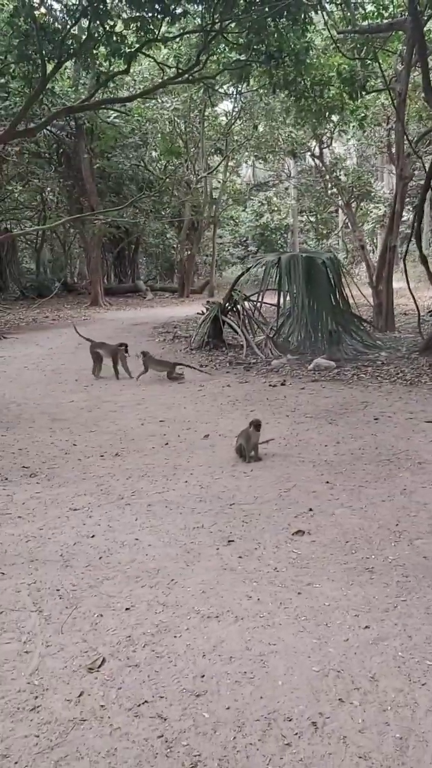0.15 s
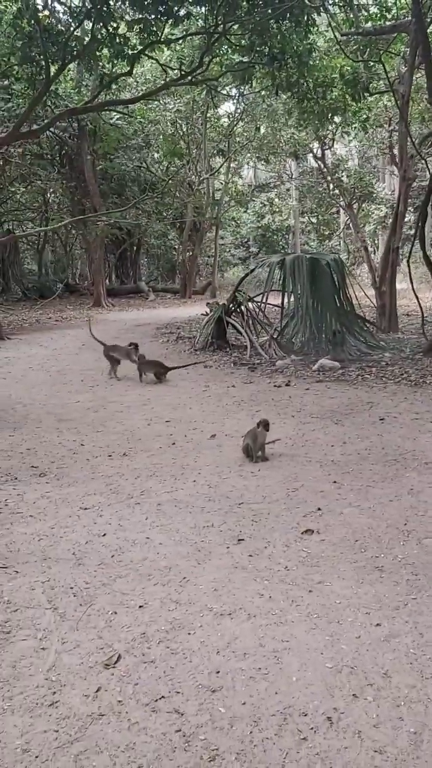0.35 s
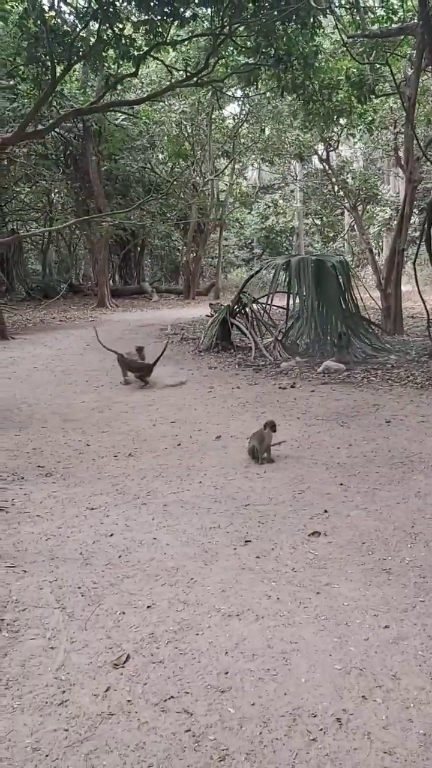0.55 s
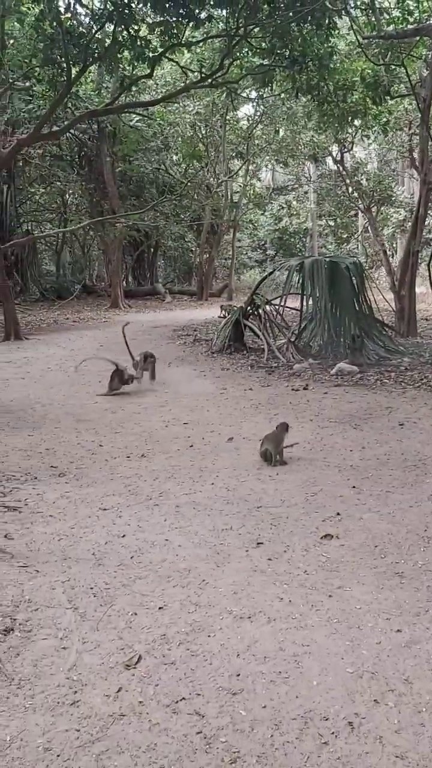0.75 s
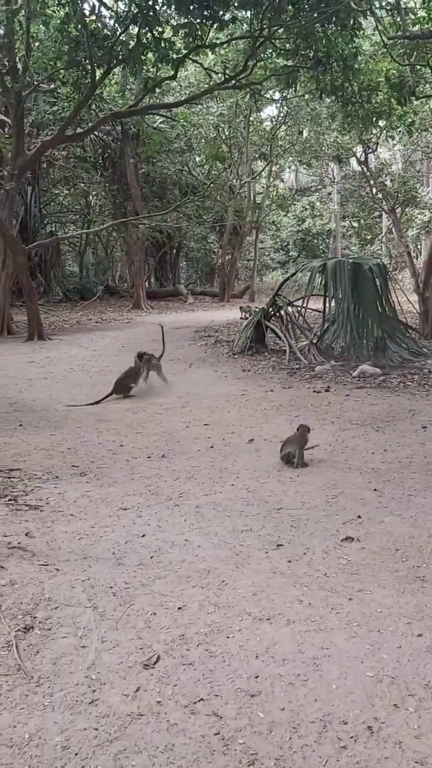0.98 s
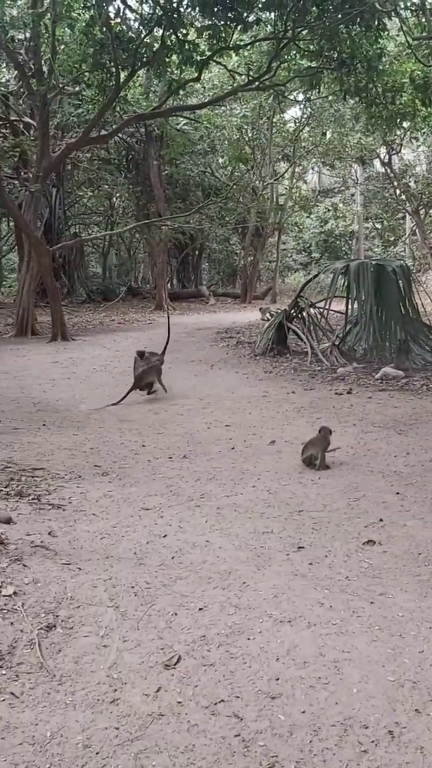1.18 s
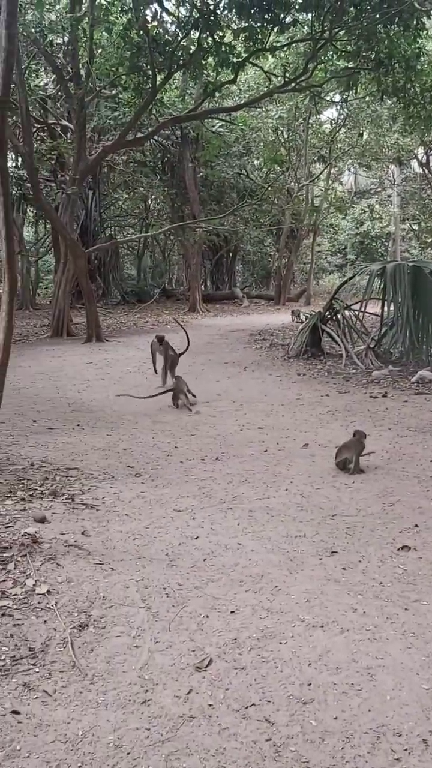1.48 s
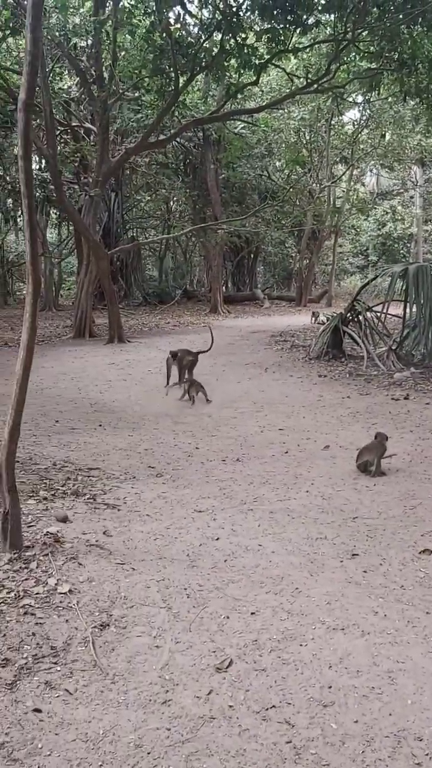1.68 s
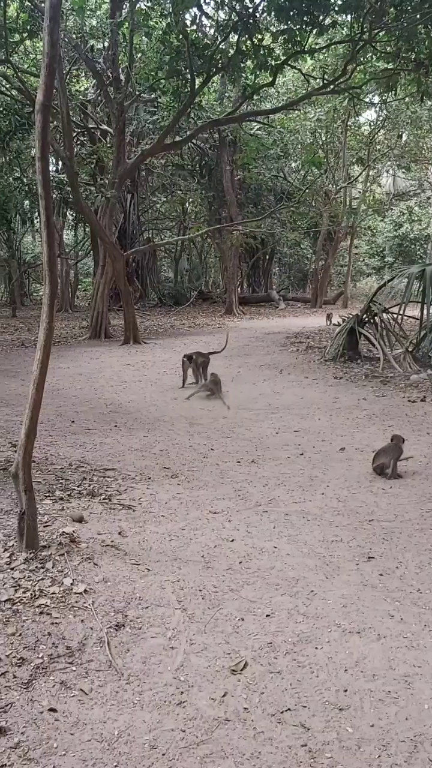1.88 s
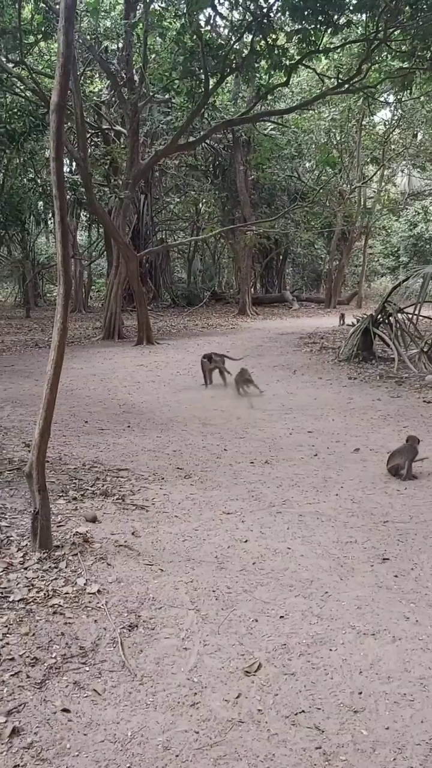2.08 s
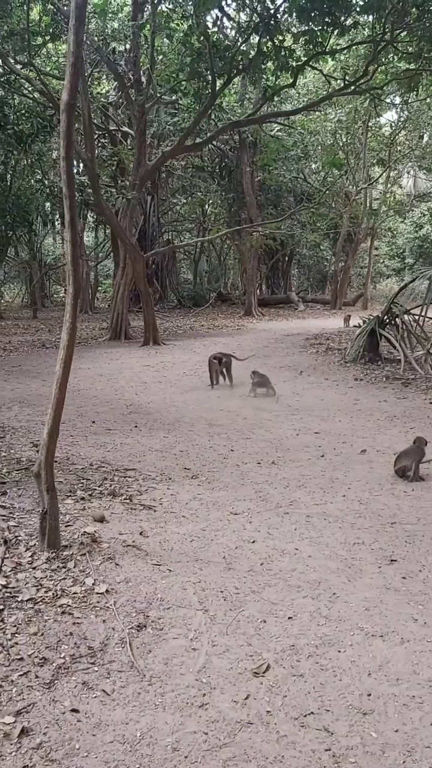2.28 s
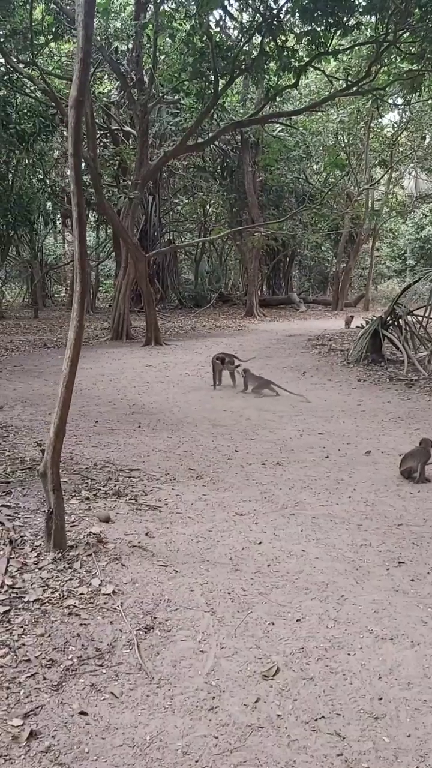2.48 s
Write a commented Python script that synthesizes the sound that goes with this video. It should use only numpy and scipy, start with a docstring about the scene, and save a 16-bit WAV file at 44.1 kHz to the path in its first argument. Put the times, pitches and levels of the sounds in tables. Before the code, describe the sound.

A monkey's long harsh shriek drops into a bark and a raspy snarl among trees.

```python
"""A monkey yelps, climbs into a long harsh shriek and falls off into a bark; a raspy snarl follows.
Two small monkeys are scuffling on a dirt path in a forest, several metres away. Their vocal folds
break from a clear tone into chaos as air rasps through, and tree trunks scatter the calls.
Insects whirr over a low rumble, with a few near knocks and scuffs of grit."""
import sys
import numpy as np
from scipy import signal
from scipy.fft import rfft, irfft
from scipy.io import wavfile
from scipy.ndimage import map_coordinates

SR = 44100
rng = np.random.default_rng(int(sys.argv[2]) if len(sys.argv) > 2 else 0)


def dump(signal):
    """Clip the signal to [-1, 1] and save it as 16-bit WAV at the path in sys.argv[1]."""
    limited = np.clip(np.atleast_2d(signal).T, -1, 1)
    pcm = np.round(limited * 32767).astype(np.int16)
    wavfile.write(sys.argv[1], SR, pcm)


N = 116865
T = np.arange(N) / SR
HZ = np.arange(N // 2 + 1) * SR / N

CUTOFF_HZ = 15900
JITTER_HZ = 727   # how fast the pitch trembles
RASP_DB, RASP_HZ = 1, 180   # quick flutter in loudness
THROAT_WAVER, THROAT_WAVER_HZ = 0.033, 20   # the throat's resonances shift by this share


def from_db(db):
    """Turn decibels into a multiplier."""
    return 10 ** (np.asarray(db) / 20)


def rms_one(x):
    """Scale a sound to an average power of 1."""
    return x / np.sqrt(np.mean(x ** 2) + 1e-20)


def in_time(rows):
    """Join timed rows into one curve per column."""
    times, *columns = np.transpose(rows)
    return [np.interp(T, np.sort(times), column) for column in columns]


def at_hz(points, hz):
    """Read between points on a log-frequency scale."""
    frequencies, values = np.transpose(points)
    return np.interp(np.log(hz + 1), np.log(frequencies), values)


def coloured(x, spectrum):
    """Turn each frequency up or down."""
    return irfft(rfft(x) * from_db(at_hz(spectrum, HZ)), N)


def drift(hz):
    """A smooth random wander, about 1 in size."""
    return rms_one(irfft(rfft(rng.standard_normal(N)) / (1 + (HZ / hz) ** 2), N))


def gate(rows, attack_s=0.0015, release_s=0.0092):
    """Open at a call's first row, die away after its last."""
    opening = np.clip((T - rows[0][0]) / attack_s, 0, 1)
    return opening * np.exp(-np.maximum(T - rows[-1][0], 0) / release_s)


def resonance(x, hz, width_hz):
    """Keep one band of frequencies, whose centre may move."""
    turn = np.exp(2j * np.pi * np.cumsum(hz + 0 * T) / SR)
    lowpass = signal.butter(2, width_hz / 2, fs=SR, output="sos")
    return rms_one((signal.sosfilt(lowpass, x / turn) * turn).real)


def ambience(spectrum, db, flutter_db):
    """Steady stereo noise, centred in the bass and wide in the treble."""
    # Each row: frequency in Hz, how alike left and right are (0-1).
    likeness = [(60, 0.95), (130, 0.99), (300, 0.88), (700, 0.66), (1500, 0.083), (4000, 0.053),
                (15000, .05)]
    alike = np.clip(at_hz(likeness, HZ), 0, 1)
    mid, side = rfft(rng.standard_normal((2, N)))
    noise = irfft(np.sqrt(1 + alike) * mid + np.sqrt(1 - alike) * side * [[1], [-1]], N)
    return rms_one(coloured(noise, spectrum)) * from_db(db + flutter_db * drift(21.4))


def forest():
    """A low rumble under a faint hiss."""
    # Each row: frequency in Hz, relative level in dB.
    rumble = [(22, -42), (49, 2), (86, 1.5), (141, -2.5), (240, -10), (389, -17.5), (500, -22.5),
              (650, -32.5), (1100, -120)]
    hiss = [(240, -7), (400, -7), (588, -4.5), (655, -3.5), (865, -8), (1310, -14.5), (2020, -13),
            (2220, -17), (2750, -23), (3640, -32.5), (5870, -17.5), (6540, -14), (7600, -15.5), (9000, -30),
            (16000, -34)]
    return ambience(rumble, db=-40, flutter_db=0.58) + ambience(hiss, db=-55, flutter_db=1.74)


def insects():
    """A thin far whirr that swells now and then."""
    # Each row: peak time in seconds, fade time in seconds, level in dB.
    swells = [(0.238, 0.071, -62), (1.68, 0.076, -63), (2.58, 0.26, -63)]
    level = sum(from_db(db) * np.exp(-((T - peak) / fade) ** 2) for peak, fade, db in swells)
    return level * np.array([resonance(rng.standard_normal(N), hz=6460, width_hz=600) for _ in range(2)])


def knocks(rise_s=0.0002):
    """Dry taps close by that die fast, each with a slightly soft contact."""
    # Each row: start in seconds, level in dB, pitch in Hz, seconds to fade 60 dB, left minus right in dB.
    taps = [(.748, -26, 2100, 0.0068, -11), (0.7526, -26, 860, 0.0096, -6.5), (0.7523, -25.5, 550, .011, 0),
            (0.7521, -32, 284, 0.022, -7), (2.3274, -32.5, 1710, 0.0072, -12),
            (2.508, -38, 1820, 0.0058, -16.5)]
    out = np.zeros((2, N))
    for start, db, hz, ring_s, pan_db in taps:
        age = np.maximum(T - start, 0)
        level = from_db(db - 60 * np.minimum(age / ring_s, 3)) * (1 - np.exp(-age / rise_s))
        out += level * np.sin(2 * np.pi * hz * age) * from_db([[pan_db / 2], [-pan_db / 2]])
    return out


def scuffs(grains_per_s=1900, spread_db=4.5, hiss_db=2):
    """Slides and ticks of grit on the dirt: separate grains mixed with hiss."""
    # Each row: start in seconds, level in dB, rise and decay in seconds.
    slides = [(.015, -55.5, 0.048, .22), (1.724, -62, 0.024, .14), (1.988, -43.5, 0.0028, .013),
              (2.22, -56, 0.022, 0.055), (2.325, -40.5, 0.00065, 0.0021), (2.349, -53, .002, 0.0056),
              (2.438, -48.5, 0.0057, 0.0079), (2.451, -54.5, 0.0054, 0.014), (2.475, -59, 0.014, .04)]
    # Each row: frequency in Hz, relative level in dB.
    grit_colour = [(600, -12), (2000, 10), (4500, 14.5), (8000, 10), (11500, 11), (15800, 6)]
    level = sum(from_db(db) * np.clip((T - start) / rise, 0, 1)
                * np.exp(-np.maximum(T - start - rise, 0) / decay) for start, db, rise, decay in slides)
    hits = rng.random(N) < grains_per_s / SR
    grains = hits * from_db(spread_db * np.minimum(rng.exponential(1, N), 3.5))
    grit = rms_one(grains * rng.standard_normal((2, N))) + from_db(hiss_db) * rng.standard_normal((2, N))
    return level * rms_one(coloured(grit, grit_colour))


def echoes(tail_db=-3.5, ground_db=-5, ground_s=.016):
    """Quick echoes off the ground and a tail scattered by trunks and leaves."""
    # Each row: frequency in Hz, seconds to fade 60 dB.
    fade_times = [(500, 0.51), (2200, 0.46), (5000, 0.57), (11000, 0.26), (16000, 0.67)]
    t, tail = T[:SR], 0
    white, hz = rfft(rng.standard_normal((2, SR))), np.arange(SR // 2 + 1)
    edges = np.geomspace(200, 17000, 8)
    for low, high in zip(edges, edges[1:]):
        band = irfft(white * ((hz >= low) & (hz < high)), SR)
        tail = tail + band * from_db(-60 * t / at_hz(fade_times, np.sqrt(low * high)))
    tail = rms_one(tail * np.clip(t / 0.029, 0, 1))
    ground = rms_one(rng.standard_normal((2, SR)) * np.exp(-t / ground_s))
    return (from_db(tail_db) * tail + from_db(ground_db) * ground) / np.sqrt(SR)


def trees(x, patterns=4, moving_hz=5.95, direct_db=-2.5):
    """The direct call plus echoes that blend between patterns as the animals move."""
    weights = np.array([drift(moving_hz) for _ in range(patterns)])
    weights = weights / np.sqrt(np.sum(weights ** 2, axis=0))
    scattered = sum(w * signal.fftconvolve(x[None], echoes(), axes=1)[:, :N] for w in weights)
    return from_db(direct_db) * x + scattered


def snarl(puffs_per_s=150, puff_s=0.0063):
    """Uneven puffs of air through a mouth that opens as the call swells."""
    # Each row: time in seconds, mouth resonance in Hz, level in dB.
    shape = [(1.828, 910, -48.5), (1.858, 1450, -47.5), (1.871, 2180, -44), (1.89, 2400, -48.5),
             (1.925, 2770, -40.5), (1.94, 2780, -44.5), (1.975, 2650, -45), (2.045, 3250, -51),
             (2.063, 3330, -37.5), (2.08, 3130, -39), (2.095, 2900, -46.5), (2.114, 2800, -39.5),
             (2.14, 3200, -44.5), (2.157, 3400, -38), (2.172, 3220, -67)]
    # Each row: frequency in Hz, relative level in dB.
    air_colour = [(500, -6), (1400, -8.5), (2500, -13), (4400, 6.5), (6500, -4), (8800, -10), (11200, -4.5),
                  (13000, -15), (15800, -17)]
    # Each row: time in seconds, level in dB.
    air_level = [(1.83, -67.5), (1.925, -50.5), (1.96, -57.5), (2.035, -46), (2.06, -38), (2.085, -45.5),
                 (2.15, -46), (2.172, -56)]
    mouth_hz, db = in_time(shape)
    air_db, = in_time(air_level)
    cycle = np.cumsum(puffs_per_s * (1 + 0.32 * drift(90))) / SR % 1
    puffs = rng.standard_normal(N) * np.exp(-cycle / puffs_per_s / puff_s)
    hiss = from_db(-2.5) * resonance(rng.standard_normal(N), mouth_hz, width_hz=2020)
    voice = resonance(puffs, mouth_hz, width_hz=950) + (mouth_hz / mouth_hz.max()) ** 2 * hiss
    air = rms_one(coloured(puffs, air_colour))
    return (voice * from_db(db) + air * from_db(air_db)) * gate(shape)


def shrill():
    """Rasping air in a high mouth resonance that sinks late in the shriek."""
    # Each row: time in seconds, resonance in Hz, level in dB.
    shape = [(.62, 11100, -35), (.76, 12500, -35), (.84, 12800, -45), (.96, 10500, -36),
             (1.04, 10300, -32.5), (1.13, 10100, -34), (1.2, 10870, -29.5), (1.25, 10200, -36)]
    hz, db = in_time(shape)
    waver = 1 + THROAT_WAVER * drift(THROAT_WAVER_HZ)
    air = resonance(rng.standard_normal(N), hz * waver, width_hz=2100)
    return air * from_db(db + RASP_DB * drift(RASP_HZ)) * gate(shape)


def squeaks(jitter=0.01615):
    """Short cracks in the voice: one overtone flares, slides and is gone."""
    # Each row: start and length in seconds, first and last pitch in Hz, level in dB.
    cracks = [(.484, 0.013, 5050, 4850, -38), (.53, .022, 12430, 13200, -38),
              (.555, 0.014, 12900, 13600, -39), (.568, 0.02, 10270, 11900, -36),
              (.578, 0.0203, 7490, 8000, -32), (.632, 0.011, 10300, 9870, -23.5),
              (.646, 0.014, 10870, 11610, -27.5), (.681, 0.0079, 10080, 9900, -33),
              (.848, .024, 5450, 5600, -35.5), (.945, .045, 5450, 5584, -34.5),
              (1.075, 0.051, 5520, 5430, -39.5), (1.218, .016, 13300, 13020, -31),
              (1.263, 0.015, 8620, 8100, -39)]
    out = 0
    for start, length, start_hz, end_hz, db in cracks:
        along = np.clip((T - start) / length, 0, 1)
        hz = (start_hz + (end_hz - start_hz) * along) * (1 + jitter * drift(JITTER_HZ))
        level = from_db(db) * np.sqrt(8 * along * (1 - along))
        out = out + level * np.sin(2 * np.pi * np.cumsum(hz) / SR)
    return out


def call(rows, throat, jitter=.06, break_hz=36.4, flicker_db=4):
    """Vocal folds that break from a clear tone into chaos, with air rasping through them."""
    pitch, db, rough = in_time(rows)
    rough = np.clip(rough * (1 + 0.2067 * drift(break_hz)), 0, 1)
    # A strained voice trembles, wobbles and wanders about its pitch.
    unsteady = jitter * drift(JITTER_HZ) + .016 * drift(hz=72) + .011 * drift(hz=22.01)
    phase = 2 * np.pi * np.cumsum(pitch * (1 + rough * unsteady)) / SR
    tone, power = 0, 1e-12
    for k in range(1, 8):
        gain = from_db(at_hz(throat, k * pitch) + flicker_db * drift(break_hz)) * (k * pitch < CUTOFF_HZ)
        tone = tone + gain * np.sin(k * phase)
        power = power + gain ** 2 / 2
    air = coloured(rng.standard_normal(N), throat)
    # Reading the noise at an uneven speed shifts its resonances.
    position = np.cumsum(1 + THROAT_WAVER * drift(THROAT_WAVER_HZ))
    air = rms_one(map_coordinates(air, [position], order=3, mode="wrap"))
    air_share = .69 * rough
    voice = np.sqrt(1 - air_share) * tone / np.sqrt(power) + np.sqrt(air_share) * air
    return voice * from_db(db + RASP_DB * rough * drift(RASP_HZ)) * gate(rows)


def monkeys():
    """All the calls, from first whimper to snarl, each shaped by the throat."""
    # Each row: time in seconds, pitch in Hz, level in dB, roughness (0 is clear, 1 or more is harsh).
    whimper = [(.33, 2400, -56.5, 0.91), (.342, 2400, -57, 0.62), (.37, 2350, -64.5, 0.88),
               (.4, 2300, -60, 1)]
    yelp = [(.403, 2426, -36, 0.48), (.41, 2400, -40, 0.6), (.428, 2450, -41.5, 0.6),
            (.45, 2350, -45.5, 0.9), (.468, 2750, -39, 0.9), (.49, 2550, -63, 1.2), (.508, 2650, -42, 0.6),
            (.53, 3000, -67, 0.5)]
    squeal = [(.415, 4220, -57, 1), (.458, 4480, -55, 0.94), (.467, 4470, -44.5, 0.67),
              (.49, 5150, -35, 0.68), (.502, 5220, -35, 1), (.55, 5390, -40, 0.91), (.58, 5200, -44, 0.83)]
    shriek = [(.48, 2625, -53.5, 0.93), (.515, 2900, -46.5, 0.92), (.53, 3120, -33.5, 0.56),
              (.562, 3282, -40, 0.76), (.585, 3865, -33.5, 0.96), (.61, 4174, -28.5, 0.97),
              (.628, 4986, -37, 0.78), (.64, 5043, -24, 0.79), (.665, 5020, -39.5, 0.88),
              (.69, 5040, -30, 0.87), (.745, 5245, -32.5, 1), (.8, 5450, -29, 1), (.86, 5570, -25.5, 0.73),
              (.915, 5550, -31.5, 0.97), (.97, 5520, -28.5, 0.62), (1.03, 5450, -30, 1),
              (1.13, 5445, -32, 0.88), (1.2, 4920, -30.5, 1)]
    whistle = [(.53, 3097, -51, 0.42), (.556, 3163, -36, 0.13), (.585, 3840, -53.5, 0.15),
               (.6, 4186, -47, 0.09), (.622, 5160, -44, 0.15), (.648, 5070, -43.5, 0),
               (.665, 5045, -42, 0.1), (.69, 5020, -38, 0.18), (.72, 4950, -53, 0.3)]   # moments when the folds ring clear
    fall = [(1.205, 3334, -26, 0.88), (1.228, 3340, -38, 0.64), (1.252, 3158, -30.5, 0.46),
            (1.272, 2825, -32, 0.65), (1.288, 2210, -31, 0.72), (1.32, 2155, -44, 0.96),
            (1.355, 1930, -52, 0.56)]
    bark = [(1.226, 3344, -38.5, 0.033), (1.238, 3288, -38.5, 0.016), (1.255, 3150, -36, 0.035),
            (1.272, 2776, -36, 0.036), (1.285, 2247, -49, 0.075), (1.296, 2207, -35, 0.11),
            (1.303, 2818, -30, 0.26), (1.315, 2781, -32, 0.68), (1.323, 2360, -23, 0.45),
            (1.333, 2248, -24.5, 0.43), (1.342, 2094, -29.5, 0.46), (1.35, 1990, -29.5, 0.4),
            (1.36, 1920, -36.5, 0.71), (1.372, 1630, -56, 0.41)]
    # How the throat colours a call. Each row: frequency in Hz, relative level in dB.
    yelp_throat = [(1400, -30.5), (1800, -18.5), (2300, -1), (3000, -18), (3700, -26), (5000, -35.5),
                   (7000, -32), (15000, -39)]
    squeal_throat = [(2000, -16.5), (3300, 3), (4200, 1), (5000, -6), (6000, -5), (8000, -6), (15000, -43)]
    shriek_throat = [(1000, -30), (1500, -36.5), (2100, -27), (2800, -20.5), (3800, -14.5), (4700, -12.5),
                     (5500, -12.5), (6500, -6.5), (8200, -2.5), (9100, -12), (10000, -3.5), (11200, -4.5),
                     (13000, -3), (14800, -4.5), (15800, -9.5)]
    whistle_throat = [(3000, -8.5), (5000, 1), (10000, -4), (15000, -10)]
    bark_throat = [(300, -9), (700, -13.5), (1150, -21), (1600, -51), (1950, 0), (2300, -3.5), (3200, 0.5),
                   (4400, -19.5), (6800, -14.5), (9000, -20), (15000, -26)]
    opening = call(whimper, yelp_throat, jitter=.13) + call(yelp, yelp_throat, jitter=.13)
    scream = (call(squeal, squeal_throat) + call(shriek, shriek_throat, jitter=.075)
              + call(whistle, whistle_throat))
    ending = call(fall, shriek_throat) + call(bark, bark_throat, jitter=.12)
    return opening + scream + ending + squeaks() + shrill() + snarl()


def scene(right_lag_s=.00002):
    """The quarrel among the trees, with knocks and scuffs close by."""
    # Each row: frequency in Hz, left minus right in dB.
    balance = [(60, -1.5), (200, -3), (400, -4.5), (700, -1.5), (1500, -5), (2500, -5.5), (4500, 0),
               (9000, -3.5), (14000, 3)]
    far = trees(monkeys()) + forest() + insects()
    sides = from_db(at_hz(balance, HZ) * np.array([[.5], [-.5]]))
    delay = np.exp(-2j * np.pi * HZ * right_lag_s * np.array([[0], [1]]))   # sound reaches the left first
    return irfft(rfft(far) * sides * delay, N) + knocks() + scuffs()


def record(dry):
    """Cut off the highest treble steeply."""
    return signal.sosfilt(signal.ellip(12, .1, 80, CUTOFF_HZ, fs=SR, output="sos"), dry)


dry = scene()
out = record(dry)
dump(out)
```